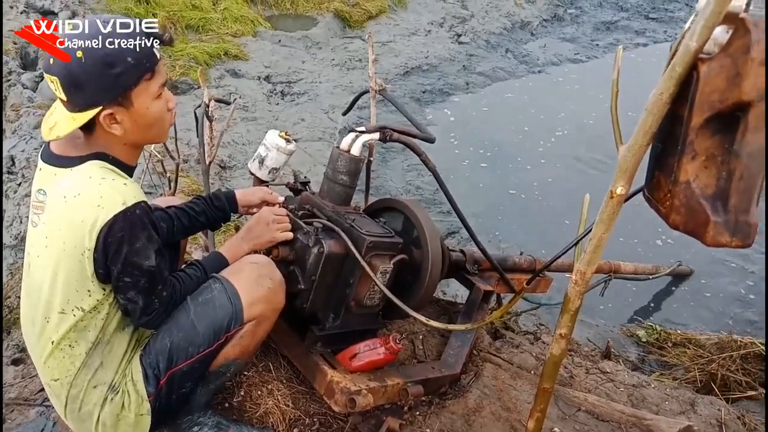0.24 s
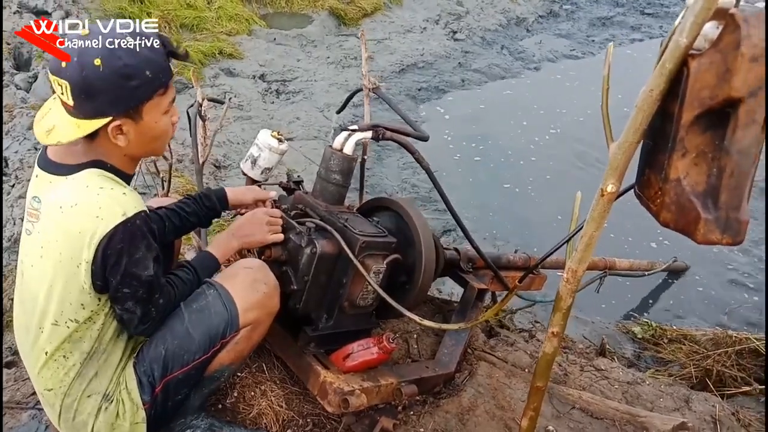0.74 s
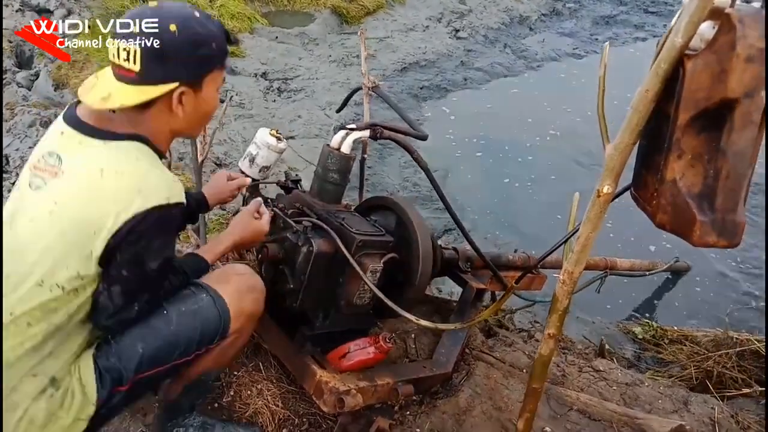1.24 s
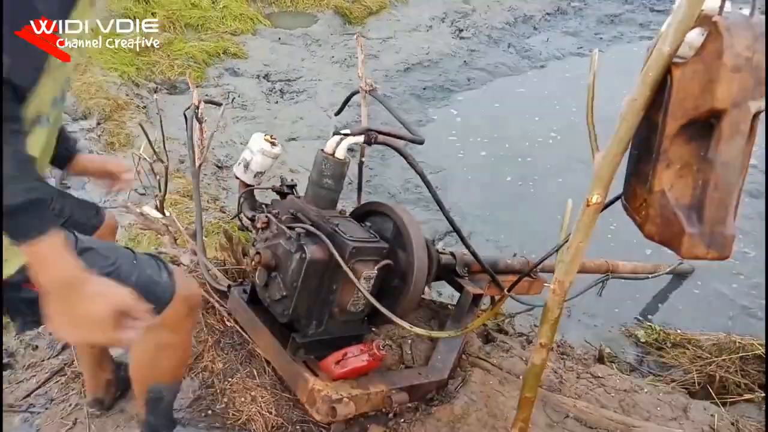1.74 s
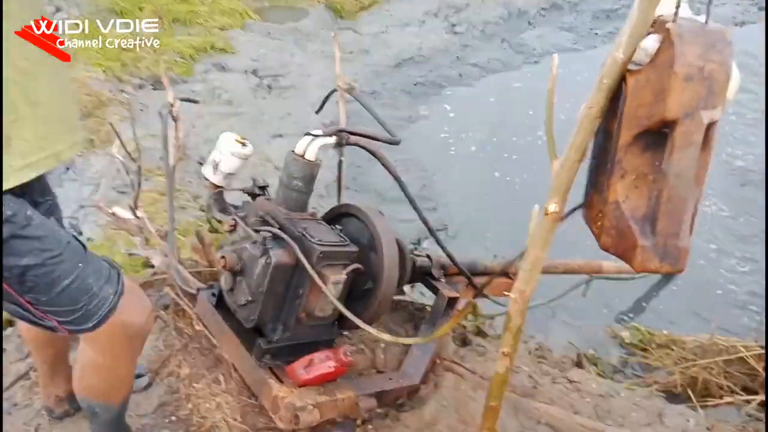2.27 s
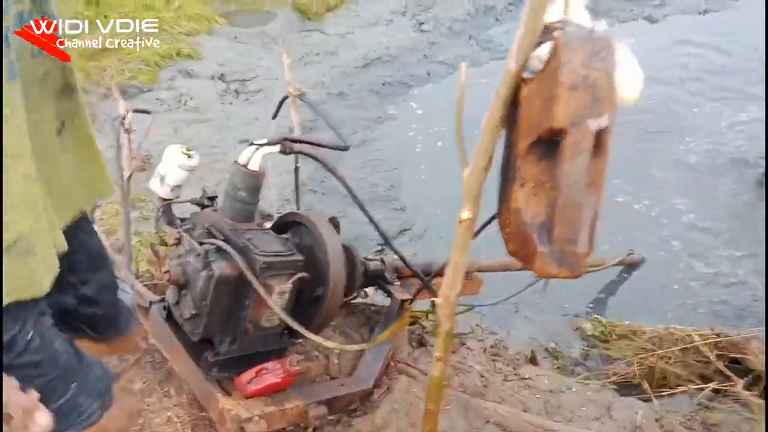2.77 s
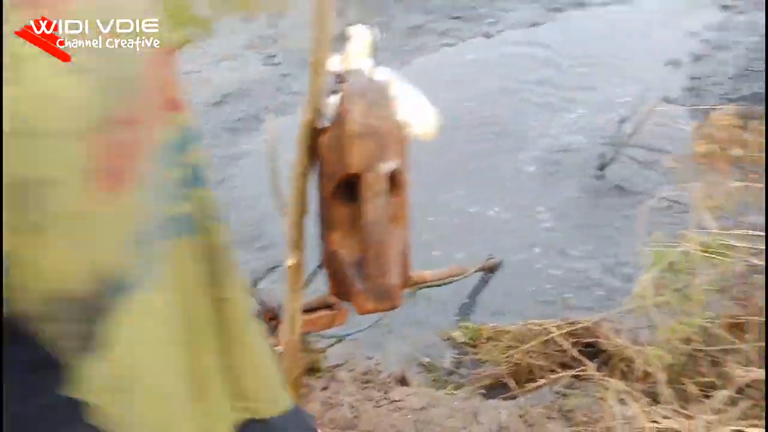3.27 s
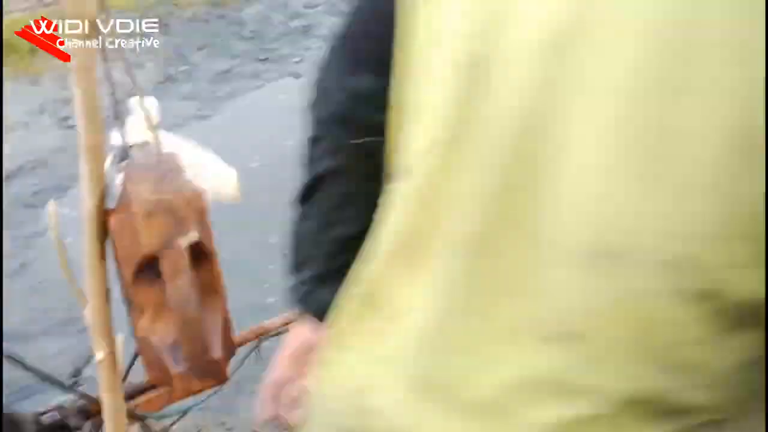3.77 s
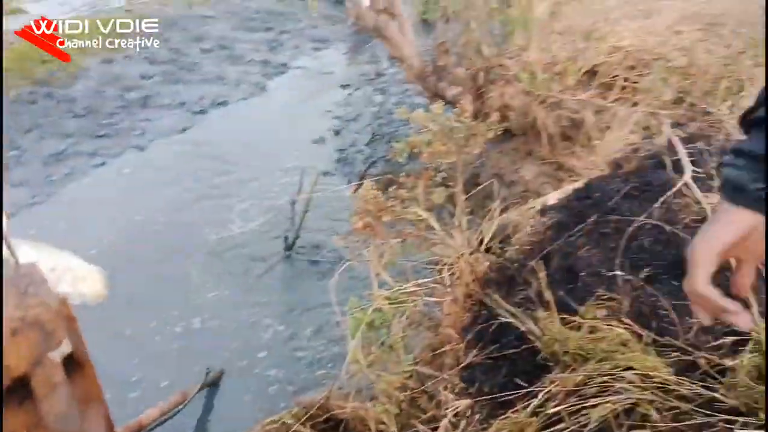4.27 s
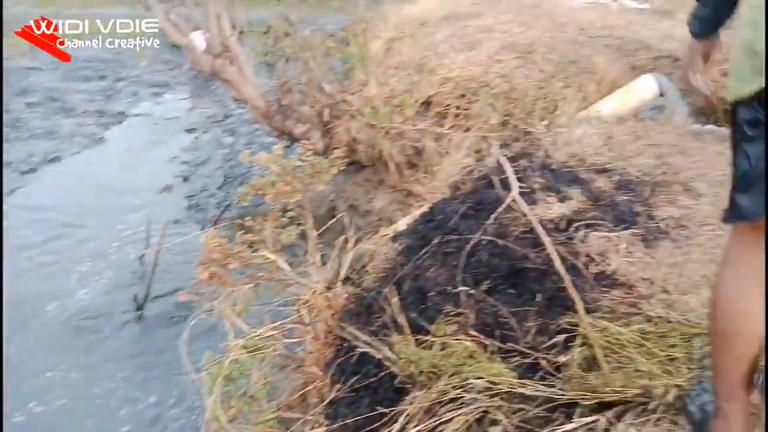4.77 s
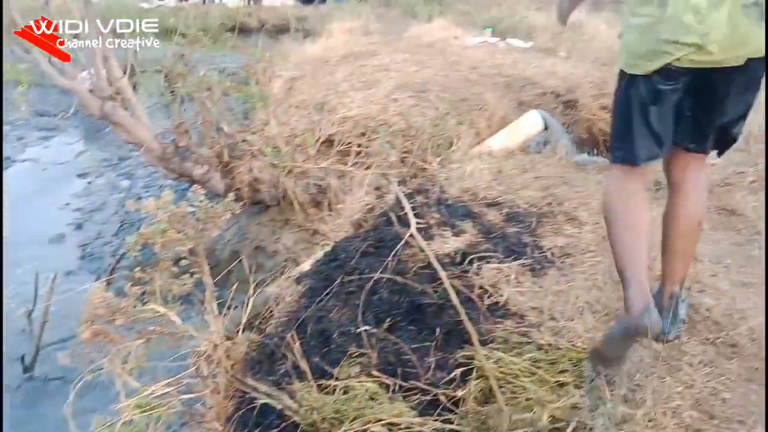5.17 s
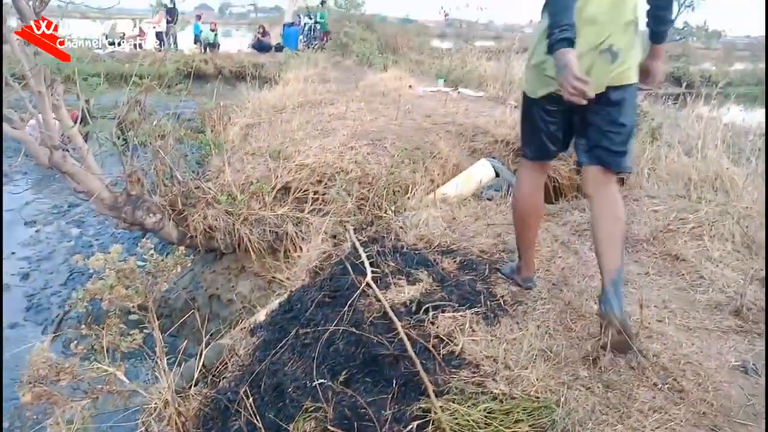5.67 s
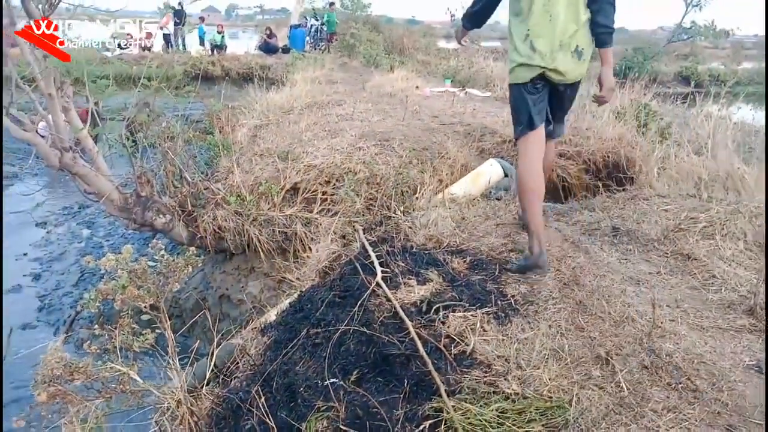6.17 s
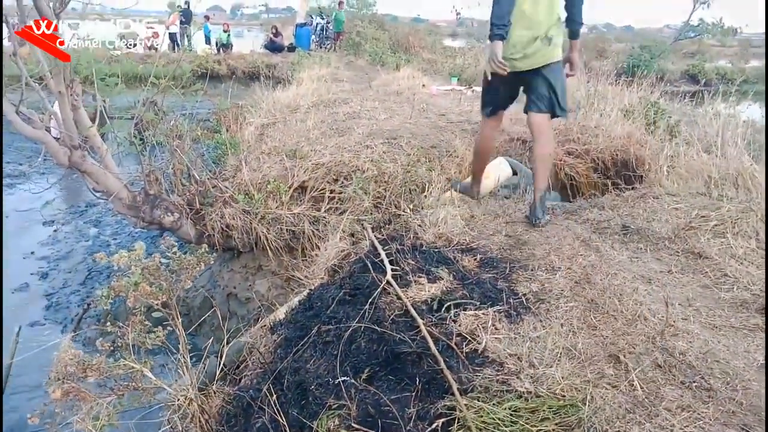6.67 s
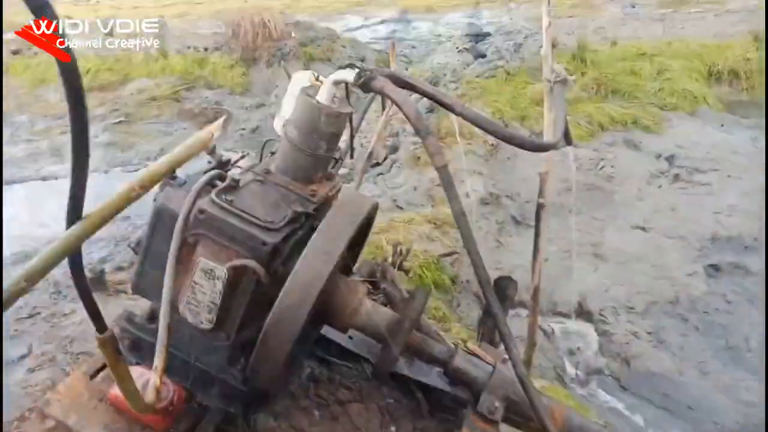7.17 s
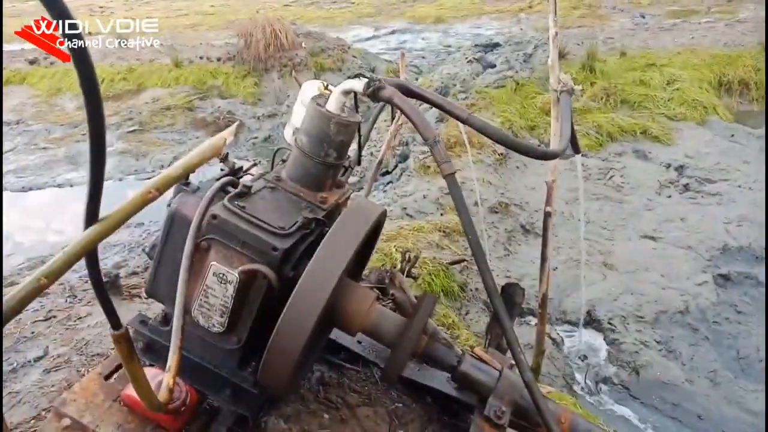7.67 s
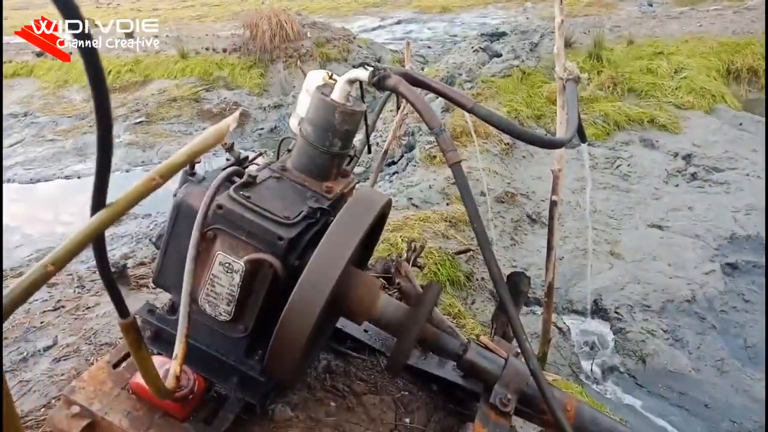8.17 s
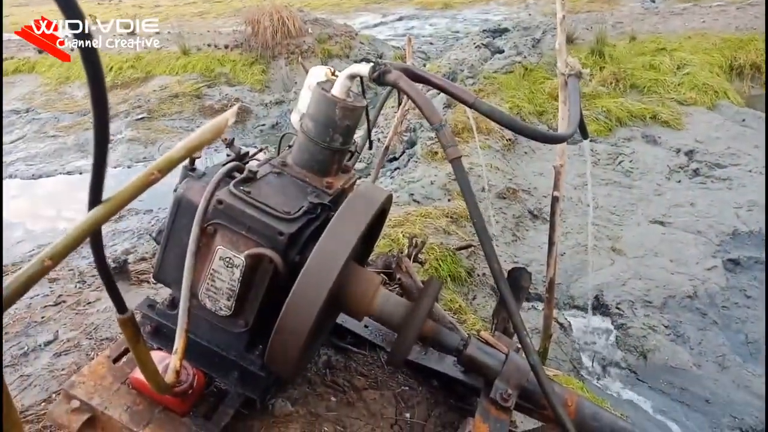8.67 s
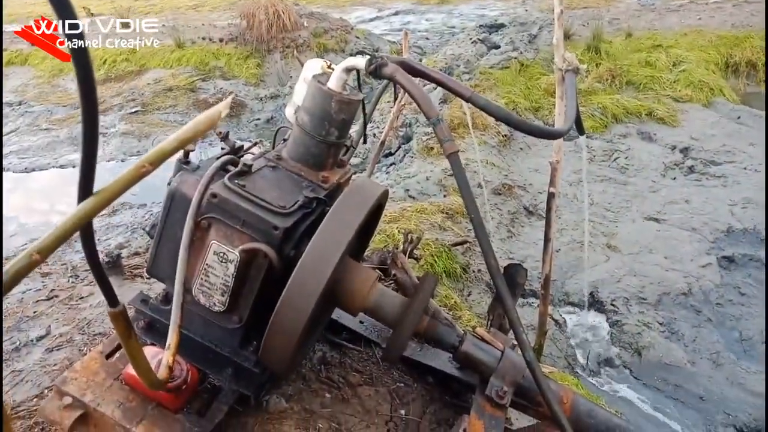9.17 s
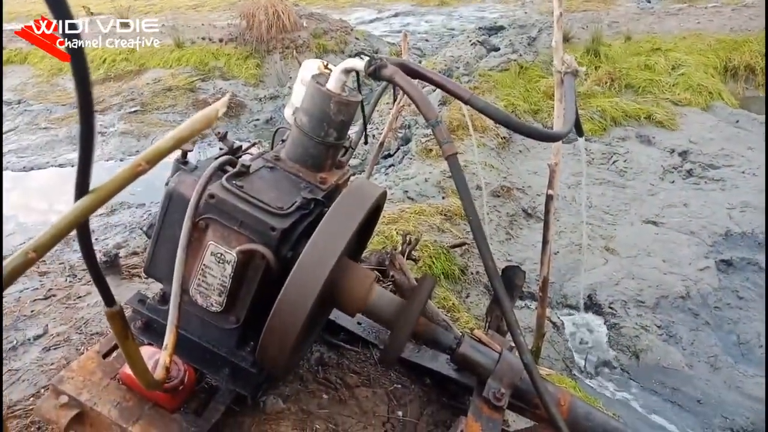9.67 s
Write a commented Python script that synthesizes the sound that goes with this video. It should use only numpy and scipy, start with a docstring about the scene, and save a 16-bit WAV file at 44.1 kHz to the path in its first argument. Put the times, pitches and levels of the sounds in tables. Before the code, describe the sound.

Loud, rapid exhaust pulses from an unmuffled diesel pump engine outdoors, carried past at close range, then cutting to a brighter, less boomy view.

```python
"""Hard, fast pops from behind a small one-cylinder diesel with an open exhaust: about 13 firings a second.
Each firing is a low gas thump and a hissing bark, with ticks and knocks from the iron block.
The engine drives a pump on a muddy bank: gears whirr steadily, a thin stream of water splashes in bubbles.
Its effort swells and sags. The phone is carried along the bank, then the sound dissolves to a spot in front.
"""
import sys
import numpy as np
from scipy import signal
from scipy.fft import rfft, irfft, next_fast_len
from scipy.io import wavfile
from scipy.ndimage import uniform_filter1d, map_coordinates

SR = 44100
rng = np.random.default_rng(int(sys.argv[2]) if len(sys.argv) > 2 else 0)


def waveform_to_disk(signal):
    """Save audio, clipped to [-1, 1], as 16-bit WAV at the path in sys.argv[1]."""
    frames = np.transpose(np.atleast_2d(signal))
    scaled = np.clip(frames, -1, 1) * 32767
    samples = np.round(scaled).astype(np.int16)
    wavfile.write(sys.argv[1], SR, samples)


N = 437472
TIME_S = np.arange(N) / SR


def undb(db):
    """Turns decibels into gain."""
    return 10 ** (np.asarray(db) / 20)


def panned(db):
    """Gains of left and right for a level difference, left minus right."""
    return undb(np.array([[.5], [-.5]]) * db)


def curves(table, at=TIME_S):
    """Reads the columns of a table at the given times, with straight lines between rows."""
    start_s, *columns = np.transpose(table)
    return [np.interp(at, start_s, column) for column in columns]


def shape(table, f, axis):
    """Reads one column of a spectrum table, in dB, on a log-frequency axis."""
    table = np.array(table)
    return np.interp(np.log(f + 1), np.log(table[:, 0]), table[:, axis])


def swell(t, middle_s, length_s):
    """A smooth rise and fall: 1 in the middle and half at either end of its length."""
    return .5 ** ((2 * (t - middle_s) / length_s) ** 2)


def filtered(x, response):
    """Applies a response given as a function of frequency."""
    size = next_fast_len(N + 4096)
    f = np.arange(size // 2 + 1) * SR / size
    return irfft(rfft(x, size) * response(f), size)[..., :N]


def resonance(f, hz, width):
    """Response of one damped ring, 1 at its centre."""
    return 1j * f * width / (hz ** 2 - f ** 2 + 1j * f * width)


def ringing(f, modes):
    """A direct path plus the rings that the sound sets off."""
    return 1 + sum(undb(db) * resonance(f, hz, width) for hz, width, db in modes)


def breeze(db, top_hz):
    """Air on each microphone port makes a faint rumble, different at left and right."""
    noise = rng.standard_normal((2, N))
    air = filtered(noise, lambda f: f / (f + 15) / (1 + (f / top_hz) ** 2))
    return air * undb(db) / air.std()


def water(db, count, low_hz, high_hz):
    """The falling stream traps bubbles, each a short ring that glides upward."""
    out = np.zeros((2, N + SR))
    for when, pitch, size, side in rng.random((count, 4)):
        start_hz = low_hz * (high_hz / low_hz) ** pitch
        cycles = np.arange(int(30 * SR / start_hz)) * start_hz / SR
        ring = np.exp(-cycles / 6) * np.sin(2 * np.pi * cycles * (1 + cycles / 200))
        bubble = ring / (size + 0.029) ** .5
        start = int(when * N)
        out[:, start:start + len(bubble)] += np.sqrt([[side], [1 - side]]) * bubble
    return out[:, :N] * undb(db) / out.std()


def firings(speed, first_s):
    """Samples at which the exhaust valve opens: once per whole cycle of the engine."""
    cycles = np.cumsum(curves(speed)[0]) / SR
    cycle = np.floor(cycles - cycles[int(first_s * SR)])
    return np.flatnonzero(np.diff(cycle) > 0)


# The engine hunts, firing harder or softer for a few strokes.
# Columns: middle_s, length_s, effort_db
SURGES = [(0.457, 0.38, -2), (0.883, 0.29, 2), (1.25, 0.29, -1), (1.554, 0.24, 2.5), (2.153, 0.23, -1.5),
          (2.624, 0.24, 2), (3.905, 0.093, 4), (4.707, .14, 1), (4.9, 0.24, 2.5), (5.37, 0.15, -2),
          (6.043, 0.26, 1), (6.287, 0.18, -1), (6.502, 0.1, 3.5), (6.936, 0.045, -0.5), (7.61, 0.15, -2.5),
          (7.95, 0.45, 2), (8.37, 0.076, 5.5), (9.218, 0.53, 2.5), (9.57, 0.068, 1.5)]
# dB that each sound gains per dB of effort
THUMP_SHARE, CRACK_SHARE, BLOCK_SHARE = 0.98, 1, 1.37


def strokes(at, thump_db, crack_db, block_db):
    """Levels of thump, crack and clatter at each firing: all follow the engine's effort."""
    effort = sum(db * swell(at / SR, middle, length) for middle, length, db in SURGES)
    return thump_db + THUMP_SHARE * effort, crack_db + CRACK_SHARE * effort, block_db + BLOCK_SHARE * effort


def repeat(at, delay_ms, sizes, template):
    """Plays a template once per firing, a fixed time after it."""
    hits = np.zeros(N + SR)
    hits[at + round(delay_ms * SR / 1000)] = sizes
    return signal.oaconvolve(hits[:N], template)[:N]


def bursts(at, db, table, scatter_db):
    """Envelope of bursts at fixed delays after each firing, each a little different in strength."""
    ms, power = np.arange(SR // 10) * 1000 / SR, 0
    for delay, size_db, rise, decay in table:
        burst = np.minimum(ms / rise, 1) ** 2 * np.exp(-np.maximum(ms - rise, 0) / decay)
        level_db = db + size_db + scatter_db * rng.standard_normal(len(at))
        power = power + repeat(at, delay, undb(level_db) ** 2, burst ** 2)
    return np.sqrt(np.maximum(power, 0))


def turbulence(at, alike_hz, same_hz):
    """Noise at two microphones: alike well below alike_hz, mostly repeated each cycle well below same_hz."""
    last_firing = np.r_[0, at][np.searchsorted(at, np.arange(N), side="right")]
    age = np.arange(N) - last_firing
    fresh, cyclic, apart = rng.standard_normal((3, N))
    same = lambda f: .8 / (1 + (f / same_hz) ** 2)
    alike = lambda f: 1 / (1 + (f / alike_hz) ** 2)
    repeated = filtered(cyclic[age], lambda f: same(f) ** .5)
    common = repeated + filtered(fresh, lambda f: (1 - same(f)) ** .5)
    mid = filtered(common, lambda f: ((1 + alike(f)) / 2) ** .5)
    side = filtered(apart, lambda f: ((1 - alike(f)) / 2) ** .5)
    return np.array([mid + side, mid - side])


# Blows in the block: injector, combustion knock, piston slap, valve overlap, intake valve closing.
# Columns: delay_ms (after the exhaust opens), level_db, rise_ms, decay_ms
BLOWS_WALK = [(57.6, -7, 2, 8.3), (60, 3, 1.1, 2.6), (3, 1.5, 3.7, 15), (22.3, -5, 1.63, 15),
              (42.7, -10, 2.9, 1.9)]
BLOWS_FRONT = [(57.6, 12.5, 6, 2.8), (60.4, 1.5, 3.9, 5.3), (3, -6, 1.7, 7.9), (22.8, 6, 3.9, 3.6),
               (42, -22, 3, 5)]
# Ring of the iron castings. Columns: pitch_hz, width_hz, level_db (over the broad clatter)
CASTING_WALK = [(573, 34, -5), (1460, 130, 4.5), (1935, 26, 7), (2534, 63, 5), (2580, 62, 0)]
CASTING_FRONT = [(676, 38, 5), (1139, 54, 13), (1555, 65, 7.1), (2280, 61, 1)]


def clatter(at, db, blows, casting, alike_hz, whirr_db):
    """Blows ring the castings over the steady whirr of gears and pump shaft."""
    strength = np.hypot(bursts(at, db, blows, scatter_db=1.3), undb(whirr_db))
    metal = strength * turbulence(at, alike_hz, same_hz=3200)
    return filtered(metal, lambda f: ringing(f, casting) * f ** 3 / (f ** 3 + 100.0 ** 3))


def whistles(at, db, stretch, table, scatter_db, rise_ms):
    """Brief tones, new in pitch and strength at every firing."""
    ms, out = np.arange(SR // 25) * 1000 / SR, np.zeros((2, N + SR))
    for hz, spread, size_db, decay in table:
        envelope = np.minimum(ms / rise_ms, 1) ** 2 * np.exp(-np.maximum(ms - rise_ms, 0) / decay)
        chances = rng.standard_normal((len(at), 3))
        for start, force, centre, (pitch, size, skew) in zip(at, db, hz * stretch, chances):
            phase = 2 * np.pi * centre * (1 + spread * pitch) * ms / 1000
            phase = phase + np.array([[.5], [-.5]]) * skew  # left and right slightly out of step
            gain = undb(force + size_db + scatter_db * np.tanh(size))
            out[:, start:start + len(ms)] += gain * envelope * np.sin(phase)
    return out[:, :N]


# Injection and ignition, just ahead of the next bark.
# Columns: delay_ms (after the exhaust opens), level_db, rise_ms, decay_ms
CLACK = [(57.04, -1.5, 1.7, 5.6)]
# Ring of the cylinder head. Columns: pitch_hz, width_hz, level_db
HEAD = [(1570, 130, -2), (2500, 250, 1.5), (3180, 510, -2)]
# Brief tones of the injector's snap. Columns: pitch_hz, pitch_spread (share), level_db, decay_ms
SNAP = [(2693, 0.061, -7, 1.3)]
SNAP_DELAY_MS = 58.4  # after the exhaust opens


def clack(at, db):
    """The injector snaps and the charge ignites, ringing the cylinder head."""
    def head_response(f):
        rings = sum(undb(size_db) * resonance(f, hz, width) for hz, width, size_db in HEAD)
        return rings / (1 + (f / 6500) ** 4)

    blow = bursts(at, db, CLACK, scatter_db=3.0) * rng.standard_normal((2, N))
    snap_at = at + int(SNAP_DELAY_MS * SR / 1000)
    snap = whistles(snap_at, db, np.ones(len(at)), SNAP, scatter_db=3, rise_ms=0.77)
    return filtered(blow, head_response) + snap


# Short whistles of the jet at the lip of the exhaust stub.
# Columns: pitch_hz (before the stretch below), pitch_spread (share), level_db, decay_ms
WHISTLES_WALK = [(2477, 0.067, -22.5, 3.8), (3390, 0.126, -37, 0.6), (4569, 0.032, -14.5, 1.87),
                 (4657, 0.038, -28.5, 11)]
# The pitch is stretched, then sinks slowly; the whistle is fainter from behind the engine.
WHISTLE_STRETCH, WHISTLE_SAG_PER_S, WHISTLE_SAG_FROM_S = 1.09, 0.0226, 2.73
WHISTLE_BEHIND_DB, WHISTLE_BANK_DB, WHISTLE_OPENS_S, WHISTLE_OPENING_S = 4, 8.5, 2.6, .25
FALTER_S, FALTER_LENGTH_S, FALTER_DB = 4.66, 0.45, -18  # it fades for a few strokes: middle, length, depth


def stub_whistle(at, crack_db):
    """The jet locks onto tones: louder as the phone comes round the engine, then sagging in pitch."""
    t = at / SR
    stretch = WHISTLE_STRETCH - WHISTLE_SAG_PER_S * np.maximum(t - WHISTLE_SAG_FROM_S, 0)
    db = np.interp(t - WHISTLE_OPENS_S, [0, WHISTLE_OPENING_S], [WHISTLE_BEHIND_DB, WHISTLE_BANK_DB])
    db = crack_db + db + FALTER_DB * swell(t, FALTER_S, FALTER_LENGTH_S)
    return whistles(at, db, stretch, WHISTLES_WALK, scatter_db=6.0, rise_ms=2.02) * panned(db=-0.5)


# The same kind of whistles in front. Columns: pitch_hz, pitch_spread (share), level_db, decay_ms
WHISTLES_FRONT = [(1481, 0.098, -27.5, 5.5), (2852, 0.1383, -20.5, 4.1), (4110, 0.095, -18.5, 3.8),
                  (5100, 0.064, -24, 6.9)]


def front_whistle(at, crack_db):
    """The jet locks briefly onto a few tones, heard from in front, more to the right."""
    steady = np.ones(len(at))
    return whistles(at, crack_db, steady, WHISTLES_FRONT, scatter_db=2.5, rise_ms=3.3) * panned(db=-12.5)


# Hissing jets of the gas: blow-down, the piston's push, valve overlap, intake.
# Columns: delay_ms (after the exhaust opens), level_db, rise_ms, decay_ms
JETS = [(-2.06, 3.5, 4, 4.8), (7.5, -12.5, 9.9, 12.3), (21, -21, 2.1, 2.2), (42, -22, 2.1, 5.1)]
# Ring of the exhaust stub. Columns: pitch_hz, width_hz, level_db (over the broad crack)
STUB = [(4400, 90, -1), (4930, 130, -14)]


def crack(at, db, alike_hz, grit_db, low_hz):
    """Gas tears out of the open stub in ragged gusts."""
    jets = bursts(at, db, JETS, scatter_db=1.5)
    # smoothed over 36 samples (0.8 ms), then brought back to full strength
    grit = uniform_filter1d(rng.standard_normal(N), size=36) * np.sqrt(36)
    gas = jets * undb(grit_db * grit) * turbulence(at, alike_hz, same_hz=1440)
    return filtered(gas, lambda f: ringing(f, STUB) * f ** 2 / (f ** 2 + low_hz ** 2))


# Slugs of gas that swing the air in the pipes. On the walk: blow-down, valve overlap and its
# higher ring, intake and its higher ring. In front: blow-down, valve overlap, intake.
# Columns: delay_ms (after the exhaust opens), level_db, start_hz, end_hz, peak_ms, fall_ms
SLUGS_WALK = [(0, -2.5, 77.6, 320.5, 7.67, 2.97), (20.5, -12.5, 238, 206, 4.58, 2.8),
              (22.5, -20, 607, 566, 2.2, 4.6), (41, -22, 218, 230, 3.5, 10.3),
              (43, -25.5, 536, 477, 6.8, 5.1)]
SLUGS_FRONT = [(0.165, 0, 93, 254, 8.44, 2.2), (21.2, -23, 270, 160, 3.2, 4.2),
               (41.3, -19, 110, 320, 4.9, 3.9)]
# Body of the thump. Columns: pitch_hz, walk_db, front_db
BOOM = [(35, 9, -10), (51.6, -10, 4), (78, 5, 6), (118, 3.5, 0), (151.5, 2, 3), (203.6, -0.5, -1),
        (243.6, -7, -4.5), (295.4, 0.5, 1.5), (409, 5, 1.5), (477, -2, 10), (554, 3, 7)]


def thump(at, db, slugs, axis, pipe_hz, pipe_db, pan_db, scatter_db):
    """Each slug of gas swings the air column, gliding in pitch; the blow-down climbs as hot gas fills the pipe."""
    ms, out = np.arange(SR // 12) * 1000 / SR, 0
    for delay, size_db, start_hz, end_hz, peak, fall in slugs:
        hz = start_hz + (end_hz - start_hz) * np.minimum(ms / (peak + fall), 1)
        rising = np.sin(np.pi / 2 * np.minimum(ms / peak, 1)) ** 0.96
        falling = np.exp(-(np.abs(ms - peak) / fall) ** 2.2)
        swing = -np.where(ms < peak, rising, falling) * np.sin(2 * np.pi * np.cumsum(hz) / SR)
        level_db = db + size_db + scatter_db * rng.standard_normal(len(at))
        out = out + repeat(at, delay, undb(level_db), swing)
    pipe = [(pipe_hz, 28, pipe_db)]  # pitch Hz, width Hz, dB
    out = filtered(out, lambda f: ringing(f, pipe) * undb(shape(BOOM, f, axis)))
    # an open pipe radiates almost nothing in the deep bass
    return filtered(out, lambda f: f ** 3 / (f ** 3 + 65.0 ** 3)) * panned(pan_db)


# Colour of the exhaust crack. Columns: pitch_hz, behind_db, bank_db, front_db
CRACK_COLOUR = [(513, -28, -10.5, -15.5), (890, -15.5, -14.5, -8), (1090, -10.5, -18, -13),
                (1710, -7.5, -16.5, -12.5), (1840, -8, -15.5, -12.5), (3020, -25.5, -12.5, -7.5),
                (3470, -2.5, -19.5, -11), (4150, -16, -13, -15.5), (4770, -17.5, -10, -10.5),
                (5280, -4, -21.5, -10.5), (6150, -17.5, -22.5, -24), (8520, -31, -38, -32),
                (12300, -42.5, -37, -38), (15000.0, -45, -38.5, -50)]
# Colour of the block. Columns: pitch_hz, behind_db, bank_db, front_db
BLOCK_COLOUR = [(497, -24, -25.5, -34.5), (685, -18.5, -17, -20.5), (950, -22.5, -29.5, -23.5),
                (1086, -14.5, -24, -31), (1480, -19.5, -38, -28), (2050, -17, -16, -20),
                (2330, -38, -11, -22.5), (3120, -28.5, -34, -20), (3700, -29, -38.5, -32.5),
                (5170, -37, -30.5, -30.5), (7300, -36, -64, -61), (9800, -65, -85, -64),
                (15000.0, -53, -60, -78)]
# Left minus right, before each sound's pan_share. Columns: pitch_hz, behind_db, bank_db, front_db
BALANCE = [(607, 4.5, 3, -12.5), (1410, 9.5, -14.5, 1), (2330, 13, -1, 6.5), (4150, -17.5, 0.5, -16.5),
           (8100, 19, -5.5, 6.5), (9350, 3, -1, -14), (15000.0, 12, -27, 1)]


def heard_from(x, table, axis, pan_share):
    """Colour and left-right balance at one standpoint: 1 behind, 2 on the bank, 3 in front."""
    return filtered(x, lambda f: undb(shape(table, f, axis)) * panned(pan_share * shape(BALANCE, f, axis)))


# Engine speed on the walk. Columns: start_s, firings_per_s
SPEED_WALK = [(0, 13.536), (.5, 13.41), (1, 13.257), (1.5, 13.193), (2, 13.176), (3, 13.139), (4, 13.128),
              (4.6, 13.135), (5.3, 13.179), (6.2, 13.182), (7.5, 13.191)]
# The walk. Columns: start_s, way (0 behind the engine to 1 on the bank), right_lag_ms,
# treble_pan_db (left minus right), distance_m (from the pipe)
WALK = [(0, 0.22, 0.081, -2.5, 0.94), (2, 0.21, 0.058, -2.5, 1.08), (2.7, 0.4, 0.11, -3.5, 1.07),
        (3.2, 0.89, 0.14, -3, 1.44), (3.7, 0.65, 0.38, -2.5, 1.35), (4.7, 0.88, 0.38, -1, 1.54),
        (5.6, 0.86, 0.38, -1.5, 1.5), (7, 1, 0.38, -1, 2.04)]
# The walker passes between engine and phone: his body takes treble,
# and hides the broad block sooner and longer than the stub.
SHADOW_S, SHADOW_LENGTH_S, SHADOW_CRACK_DB, SHADOW_BLOCK_DB = 3.556, 0.32, -9.5, -6.5
SHADOW_LEAD_S, SHADOW_BLOCK_LENGTH_S = 0.17, 0.67


def walking_view():
    """From behind the engine to the bank; the engine reaches the left microphone first."""
    at = firings(SPEED_WALK, first_s=.032)
    thump_db, crack_db, block_db = strokes(at, thump_db=-11.0, crack_db=-4.0, block_db=-5)
    crack_db = crack_db + SHADOW_CRACK_DB * swell(at / SR, SHADOW_S, SHADOW_LENGTH_S)
    block_shadow = swell(at / SR, SHADOW_S - SHADOW_LEAD_S, SHADOW_BLOCK_LENGTH_S)
    block_db = block_db + SHADOW_BLOCK_DB * block_shadow
    way, lag_ms, pan_db, distance = curves(WALK)
    way = np.clip(way, 0, 1)

    gas = crack(at, crack_db, alike_hz=3800, grit_db=2, low_hz=123)
    metal = clatter(at, block_db, BLOWS_WALK, CASTING_WALK, alike_hz=3300, whirr_db=-18)
    behind = heard_from(gas, CRACK_COLOUR, axis=1, pan_share=0.81)
    behind = behind + heard_from(metal, BLOCK_COLOUR, axis=1, pan_share=0.9)
    bank = heard_from(gas, CRACK_COLOUR, axis=2, pan_share=0.68)
    bank = bank + heard_from(metal, BLOCK_COLOUR, axis=2, pan_share=0.97)
    low = thump(at, thump_db, SLUGS_WALK, axis=1, pipe_hz=144.5, pipe_db=-7.5, pan_db=1.5, scatter_db=.5)
    knock = clack(at, block_db) * undb(-9.0)
    treble = knock + np.sqrt(1 - way) * behind + np.sqrt(way) * bank + stub_whistle(at, crack_db)

    left, right = low / distance + treble * panned(pan_db)
    right = map_coordinates(right, [np.arange(N) - lag_ms * SR / 1000], order=3, mode="nearest")
    return np.array([left, right]) + water(db=-49.0, count=2200, low_hz=496.5, high_hz=3970)


# Engine speed in front. Columns: start_s, firings_per_s
SPEED_FRONT = [(7, 13.131), (8.2, 13.097), (8.8, 13.145), (9.92, 13.137)]


def front_view():
    """Close to the flywheel and the splashing stream, the exhaust barks brighter."""
    at = firings(SPEED_FRONT, first_s=7.101)
    thump_db, crack_db, block_db = strokes(at, thump_db=-19.0, crack_db=-2.0, block_db=-9.5)
    gas = crack(at, crack_db, alike_hz=2120, grit_db=0.5, low_hz=150)
    metal = clatter(at, block_db, BLOWS_FRONT, CASTING_FRONT, alike_hz=1970, whirr_db=-18.0)
    low = thump(at, thump_db, SLUGS_FRONT, axis=2, pipe_hz=319.4, pipe_db=5.0, pan_db=3.5, scatter_db=2.4)
    knock = clack(at, block_db) * undb(-10.5)
    engine = low + knock + front_whistle(at, crack_db)
    engine = engine + heard_from(gas, CRACK_COLOUR, axis=3, pan_share=0.94)
    engine = engine + heard_from(metal, BLOCK_COLOUR, axis=3, pan_share=0.31)
    return engine + water(db=-44.5, count=2600, low_hz=505, high_hz=4450)


# The dissolve. Columns: start_s, walk_gain, front_gain (plain factors)
DISSOLVE = [(6.9, 1, 0), (7.1, .75, .42), (7.35, .5, .55), (7.62, 0, 1)]


def scene():
    """The walk dissolves into the view from in front, over a faint breeze."""
    walk_gain, front_gain = curves(DISSOLVE)
    return walk_gain * walking_view() + front_gain * front_view() + breeze(db=-64.0, top_hz=60)


def record(dry):
    """The phone rounds the highest peaks and cuts the top above 15.7 kHz."""
    rounded = dry / (1 + dry ** 6) ** (1 / 6)
    return signal.sosfilt(signal.ellip(8, .2, 70, 15700, fs=SR, output="sos"), rounded)


dry = scene()
out = record(dry)
waveform_to_disk(out)
```